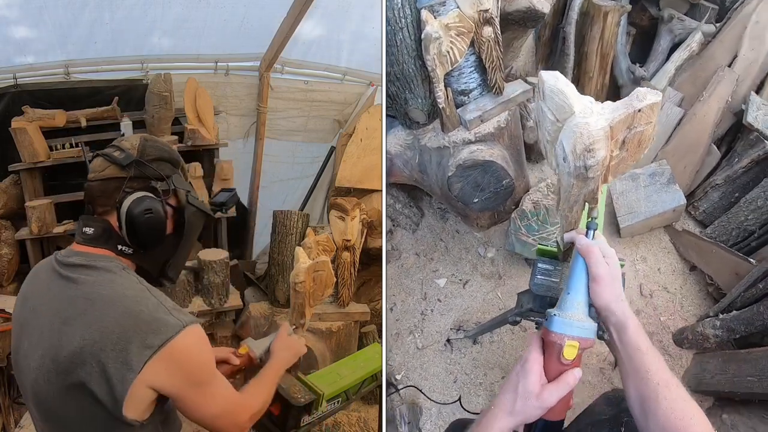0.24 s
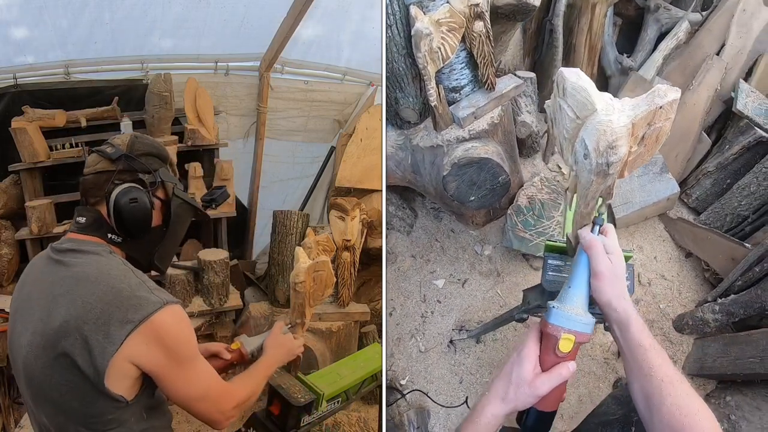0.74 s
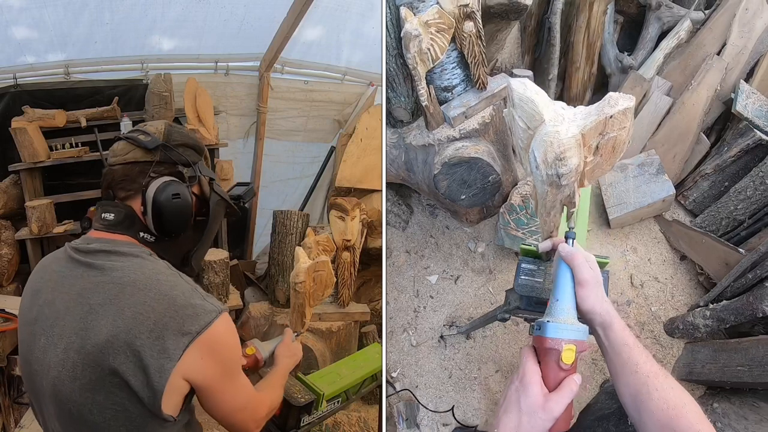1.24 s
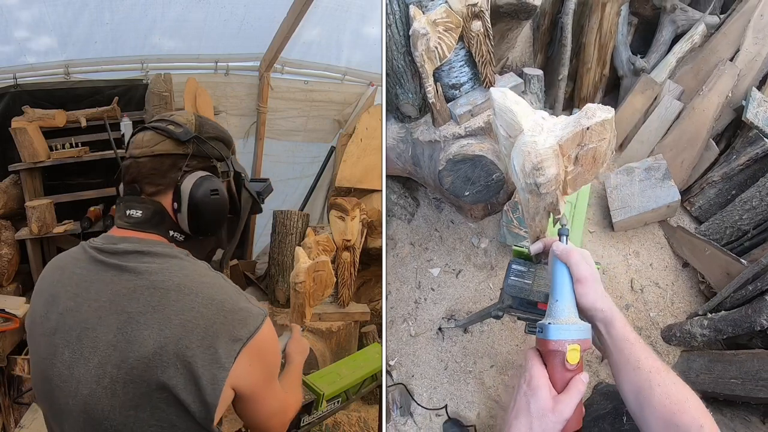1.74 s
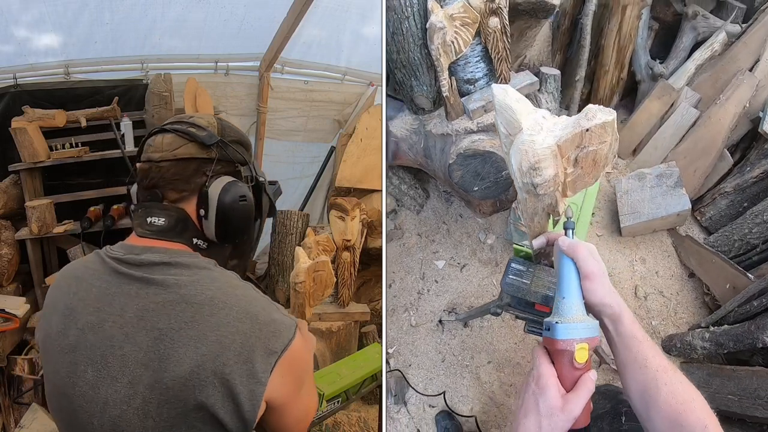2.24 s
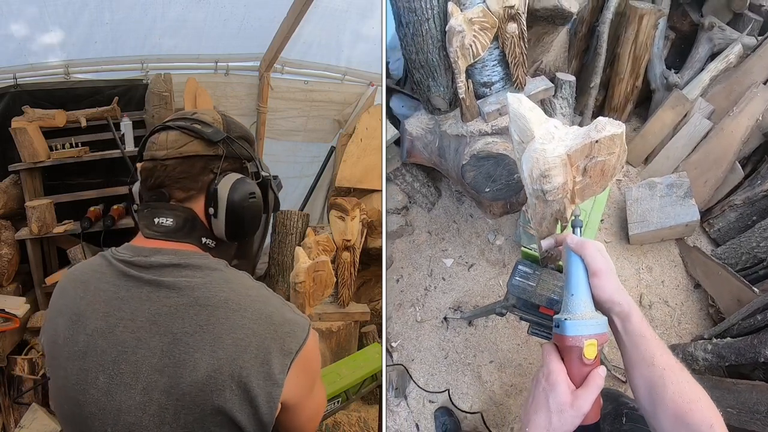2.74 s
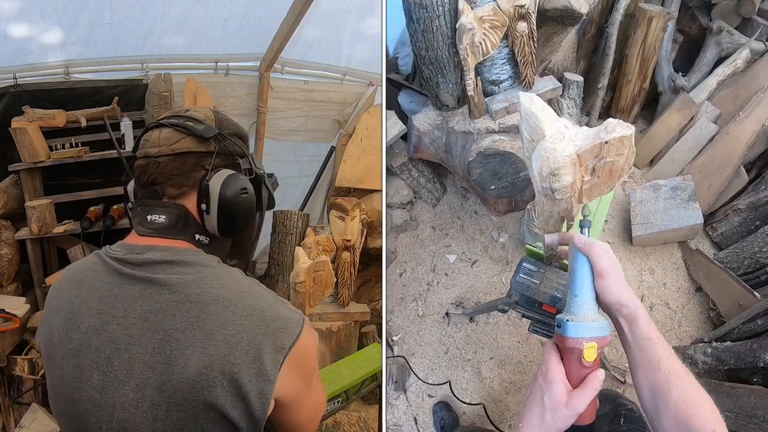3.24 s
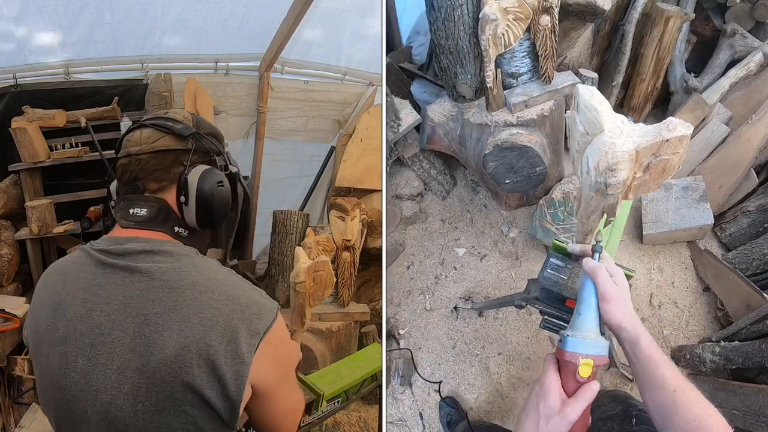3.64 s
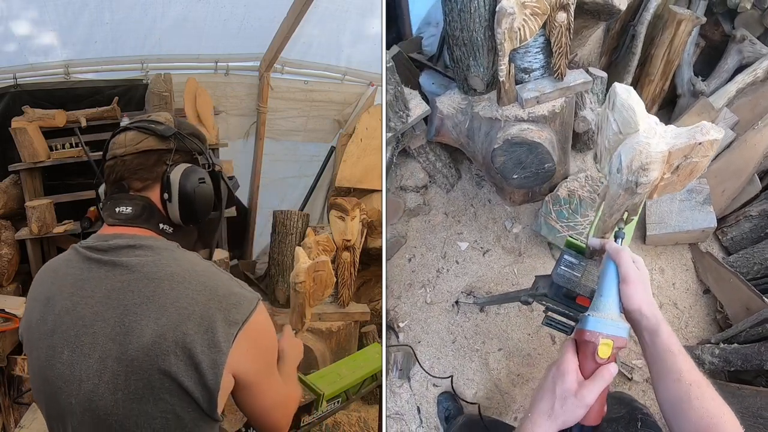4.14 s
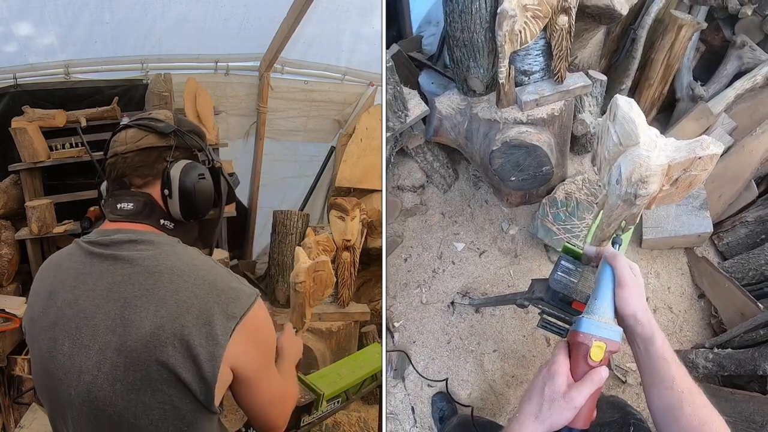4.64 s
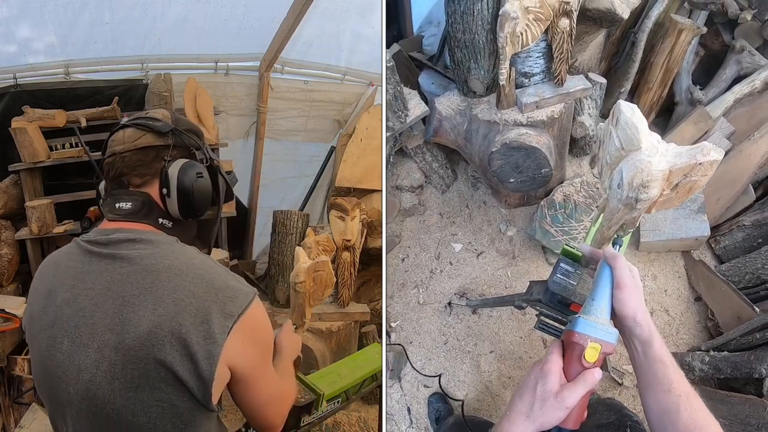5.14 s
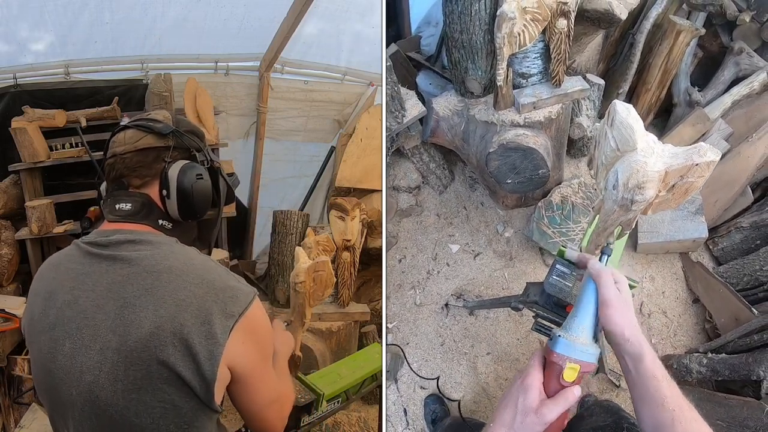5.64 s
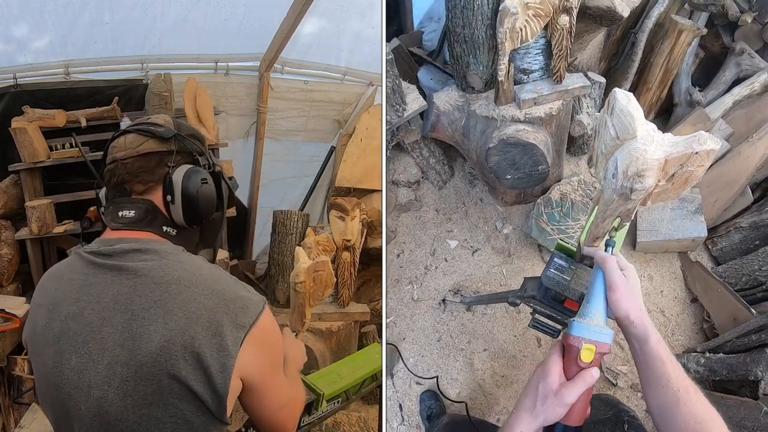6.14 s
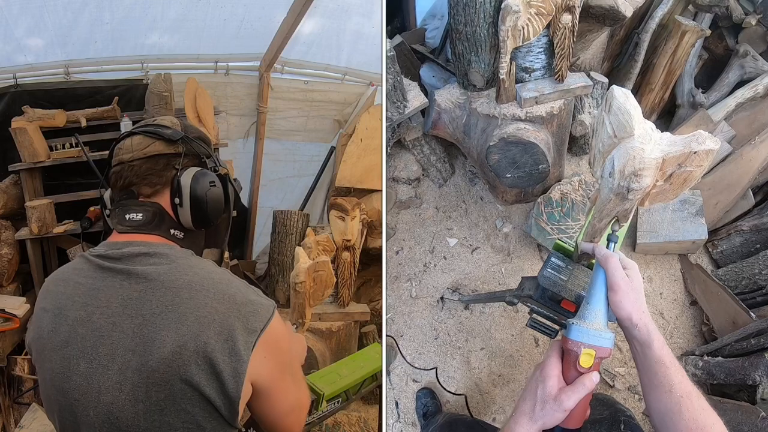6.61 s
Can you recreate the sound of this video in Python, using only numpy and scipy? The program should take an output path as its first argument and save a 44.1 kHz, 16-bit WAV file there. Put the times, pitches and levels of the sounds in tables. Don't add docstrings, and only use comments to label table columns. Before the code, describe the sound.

An electric die grinder runs throughout in a tent workshop, heard close by a small stereo camera: dense fan roar, a hum near 470 hertz, hissing chips and faint low rumble. It is already cutting at 0 s, buzzing unevenly until about 0.5, then lightens and speeds up. At 1.1 a strong, piercing singing pass begins, stuttering until 1.9, followed at once by a short ringing touch to 2.15. From 2.3 to 3.2 a brighter, raspier pass drags the pitch down; it rises again by 3.7. Steady cutting starts around 3.6, with extra contact near 4, then a loud, long squeal from 4.4 to 5.3 sinks lowest at its end. The motor recovers. Two sharp bites at 5.9 run into a final buzzing, singing pass from 6.1, continuing to the end near 6.9. Loud bites momentarily duck the roar.

```python
import sys
import numpy as np
from scipy import signal
from scipy.fft import rfft, irfft, next_fast_len
from scipy.io import wavfile
from scipy.ndimage import uniform_filter1d

SR = 44100
rng = np.random.default_rng(int(sys.argv[2]) if len(sys.argv) > 2 else 0)


def store_pcm(level_fs):
    pcm = np.round(np.clip(level_fs, -1, 1) * 32767).astype(np.int16)
    wavfile.write(sys.argv[1], SR, np.atleast_2d(pcm).T)


def undo_db(level):
    steps = np.asarray(level, float) / 20
    return 10 ** steps


N = 302967

# (frequency [Hz], difference [dB])
LEFT_LEAN = [(130, -1), (400, 2), (700, -2.5), (2500, -2), (6000, -1.5), (13000, 1)]
# (time [s], length [s], upper harmonics [dB], singing harmonics [dB])
PASSES = [
    (-.03, 0.51, -54, -47),
    (1.092, 0.85, -50, -44.5),
    (1.93, 0.22, -67, -46),
    (2.3, 0.93, -45, -57),
    (3.616, 1, -48, -51.5),
    (3.954, 0.434, -49, -55.5),
    (4.355, 0.99, -50, -45.5),
    (5.87, 0.077, -42, -44.5),
    (5.949, 0.058, -38, -39.5),
    (6.083, .9, -46, -46.5),
]


def in_time(rows):
    s, *columns = np.transpose(rows)
    return [np.interp(np.arange(N) / SR, s, column) for column in columns]


def at_hz(points, hz):
    table_hz, values = np.array(points).T
    return np.interp(np.log(hz), np.log(table_hz), values)


def drift(rate, db=None):
    r = np.exp(-80 * np.pi * rate / SR)
    noise = rng.standard_normal(N // 40 + 2002)
    slow = signal.lfilter([1], [1, -2 * r, r * r], noise)[2000:]
    slow = slow / np.std(slow)
    values = slow if db is None else undo_db(db * slow)
    return np.interp(np.arange(N) / 40, np.arange(len(slow)), values)


def swell(start, length):
    out = np.zeros(N)
    span = np.arange(round(start * SR), min(round((start + length) * SR), N))
    out[span] = np.sqrt(np.sin(np.linspace(0, np.pi, len(span))) + 1e-9)
    return out


def resting(start, length, flash_db=0):
    land_s, settle_s, lift_s = 0.015, 0.11, 0.028
    end = start + length
    landed = start + land_s
    settled = landed + min(settle_s, length / 3)
    times = [start, landed, settled, max(end - lift_s, settled), end]
    return np.interp(np.arange(N) / SR, times, [0, undo_db(flash_db), 1, 1, 0])


def stereo_noise(spectrum, resonances):
    # (frequency [Hz], likeness [0 to 1])
    likeness = [(60, 0.96), (130, 0.91), (290, 0.9), (630, 0.82), (1380, 0.57), (3010, 0.89), (6590, 0.14),
                (14400, 0.01)]
    size = next_fast_len(N)
    hz = np.maximum(np.arange(size // 2 + 1) * SR / size, 1)
    ringing_db = sum(db / (1 + (2 * (hz - f) / width) ** 2) for f, width, db in resonances)
    colour_db = at_hz(spectrum, hz) + ringing_db
    alike = np.clip(at_hz(likeness, hz), 0, 1)
    mid, side = rfft(rng.standard_normal((2, size)))
    port = np.array([[1], [-1]])
    both = np.sqrt(1 + alike) * mid + np.sqrt(1 - alike) * side * port
    both = both * undo_db(colour_db + port * at_hz(LEFT_LEAN, hz) / 2)
    return hz, size, both / np.std(irfft(both, size))


def harmonic(turn, k, gain, flutter_db, waver, spread):
    phase = k * turn + waver * drift(42) + rng.uniform(0, 2 * np.pi)
    apart = spread * drift(2.2)
    lean = undo_db(at_hz(LEFT_LEAN, 470 * k) / 2) * np.exp(0.38 * apart)
    gain = np.sqrt(2) * gain * drift(20, db=flutter_db)
    return np.array([gain * lean * np.sin(phase + apart), gain / lean * np.sin(phase - apart)])


def above(level_db, floor_db):
    power = undo_db(2 * level_db)
    return 10 * np.log10(np.maximum(power - undo_db(2 * floor_db), power * undo_db(-16)))


def swells(rows, trim_db=0):
    return sum(undo_db(db + trim_db) * swell(s, length) for s, length, db in rows)


def of_multiple(rows, k):
    return [(s, length, db) for s, length, multiple, db in rows if multiple == k]


def raised(k):
    # (time [s], length [s], multiple of the shaft rate, level [dB])
    catches = [(.578, .03, 9, -40), (1.94, .04, 9, -39), (0, .57, 2, -45), (2.5, .45, 2, -50),
               (5.96, .06, 11, -44), (5.96, .06, 9, -44), (1.12, .14, 12, -48), (1.12, .16, 11, -50),
               (6.12, .45, 10, -50), (6.12, .6, 12, -51), (6.4, .33, 13, -51), (1.68, .36, 12, -51)]
    return swells(of_multiple(catches, k))


def surroundings(roar_db):
    # (frequency [Hz], level [dB per Hz])
    rumble = [(15, -41), (25, -14), (75, 0), (129, -14), (167, -2), (269, -3.5), (330, 3.5), (430, -19),
              (730, -120)]
    hz, size, both = stereo_noise(rumble, [])
    return undo_db(-66 + 0.47 * (roar_db + 48) + 1.1 * drift(2.9)) * irfft(both, size)[:, :N]


def workpiece():
    # (time [s], length [s], level [dB])
    drones = [
        (0.273, .09, -57),
        (1.707, 0.16, -53),
        (4.98, 0.53, -58),
    ]
    drone_hz = 356
    gain = swells(drones) * undo_db(1.3 * drift(16))
    return gain * np.sin(2 * np.pi * drone_hz * np.arange(N) / SR + 0.55 * drift(15))


def roar(turn, roar_db, rasp_db, hiss_db):
    # (frequency [Hz], level [dB per Hz])
    air = [(150, -27), (300, -23), (450, -15.5), (620, -9), (1000, -6.5), (2200, -3), (3000, 0.5),
           (4500, -7), (6250, -6), (8070, -6), (10000, -10.5), (10800, -15), (12900, -22.5), (14500, -29.5)]
    # (frequency [Hz],
    # width [Hz], level [dB])
    peaks_and_dips = [(530, 26, -14.5), (762.4, 42, 9), (1065, 190, 6), (1345, 120, 5.5), (1672, 23, 8.5),
                      (2730, 170, -0.5), (8120, 510, 7), (9600, 400, 7), (10600, 220, -16), (13600, 240, -14),
                      (14100, 450, 8)]
    hz, size, both = stereo_noise(air, peaks_and_dips)
    out, gust, throb = 0, drift(19), np.cos(turn)
    for octave in range(-3, 5):
        share = np.cos(np.clip(np.log2(hz / 1000) - octave, -1, 1) * np.pi / 2) ** 2
        rasp = np.interp(octave, [0, 2, 3], [0, 1, 0]) ** 2
        hiss = octave > 2
        patch_db = roar_db + 13.5 + rasp * rasp_db + hiss * hiss_db
        gain = undo_db(patch_db + 0.6 * gust + 0.98 * drift(7.7))
        out = out + gain * (1 + 0.053 * hiss * throb) * irfft(both * share, size)[:, :N]
    return out


def motor(turn, speed, hum_db, roar_db):
    # (multiple of the shaft rate, level [dB])
    whines = [
        (4, -49.5),
        (27, -61.5),
    ]
    out = harmonic(turn, k=1, gain=undo_db(hum_db), flutter_db=0.5, waver=.03, spread=0.22)
    wander_db = 2 * drift(3.4)
    second_db = -50 + 0.2 * (hum_db + 48) + wander_db
    second = undo_db(above(second_db, roar_db - 13)) + raised(2)
    out += harmonic(turn, k=2, gain=second, flutter_db=2.0, waver=0.38, spread=0.89)
    for k, db in whines:
        gain = undo_db(db + .5 * (roar_db + 47) + 1.5 * drift(1.5) + .007 * k * (speed - 482))
        out += harmonic(turn, k=k, gain=gain, flutter_db=2.1, waver=.3, spread=.5 + .03 * k)
    return out


def burr(turn):
    # (multiple of the shaft rate, level [dB])
    upper_shares = [(3, -14), (4, -32), (9, -13.5), (12, -19), (15, -18.5), (16, -12), (18, -21.5),
                    (21, -21), (23, -28.5), (26, -28.5), (30, -36)]
    # (time [s], length [s], multiple of the shaft rate, level [dB])
    squeals = [(0.13, 0.27, 14, -45), (0.17, 0.18, 11, -48), (0.68, 0.17, 4, -44), (1.1, 0.21, 15, -49),
               (1.11, 0.16, 13, -49), (1.13, 0.23, 10, -47), (1.15, 0.29, 9, -50), (1.37, 0.54, 16, -47),
               (1.86, 0.25, 9, -51), (2.02, 0.1, 16, -46), (2.65, 0.26, 18, -47), (2.7, 0.17, 17, -48),
               (6.3, 0.11, 16, -42), (2.97, 0.18, 18, -46), (4.01, 0.12, 16, -43), (4.22, 0.09, 12, -49),
               (4.37, 0.81, 11, -48), (4.39, 0.49, 9, -46), (4.44, 0.42, 16, -49), (4.58, 0.71, 4, -54),
               (4.6, 0.29, 18, -47), (4.84, 0.44, 13, -49), (4.91, 0.39, 18, -47), (4.95, 0.18, 17, -48),
               (5.14, 0.25, 15, -48), (5.86, 0.17, 9, -45), (5.95, 0.07, 14, -44), (5.96, 0.06, 12, -43),
               (6.11, 0.24, 9, -46), (6.11, 0.1, 16, -40)]
    sing_shares = [-2.9, 2.5, -6, -6.0]
    # (time [s], length [s], level [dB])
    fifth = [(0, 0.11, -45), (.15, 0.13, -38), (.26, 0.2, -43), (.43, 0.022, -33), (1.2, 0.38, -38),
             (1.62, .28, -43.5), (1.935, .04, -33.5), (4, 0.038, -39), (4.15, .03, -47), (4.27, .04, -41),
             (4.385, .14, -38.5), (4.6, 0.07, -37), (4.7, 0.27, -48), (5.87, 0.015, -32.5),
             (5.96, 0.063, -44), (6.27, 0.049, -39), (6.36, 0.025, -35), (6.42, 0.046, -36),
             (6.5, 0.11, -38), (6.79, 0.091, -42)]
    sixth = [(0, 0.14, -36.5), (0.217, 0.23, -38.5), (0.437, .11, -35), (1.114, .035, -29.5),
             (1.153, .06, -30.5), (1.205, 0.096, -28.5), (1.336, 0.062, -29.5), (1.383, .17, -35.5),
             (1.508, 0.09, -36), (1.58, 0.043, -32.5), (1.63, 0.067, -34), (1.684, 0.16, -35.5),
             (1.961, .05, -29.5), (2.024, .12, -28), (2.283, .035, -39), (4.025, 0.053, -34),
             (4.252, 0.021, -36), (4.298, 0.014, -30), (4.394, .03, -34), (4.406, 0.091, -34.5),
             (4.501, 0.32, -29), (4.773, 0.21, -36), (5.05, 0.15, -40), (5.965, 0.045, -33),
             (6.122, .06, -38), (6.22, .04, -35), (6.27, 0.056, -34), (6.37, 0.084, -33),
             (6.673, .05, -35.5), (6.834, .1, -34.5)]
    seventh = [(1.115, 0.039, -35.5), (1.2, 0.16, -47), (1.45, .4, -48), (2.045, .05, -39),
               (4.38, 0.29, -42), (4.76, 0.39, -35), (5.05, 0.038, -49), (5.1, 0.13, -38),
               (5.2, 0.086, -34.5), (5.27, 0.07, -44), (5.98, 0.044, -30.5), (6.12, 0.27, -46)]
    eighth = [(1.22, 0.14, -43), (4.01, 0.018, -42), (4.15, 0.033, -43), (4.3, 0.079, -44),
              (4.39, 0.03, -33), (4.56, .03, -56), (4.66, 0.41, -45), (5.12, 0.14, -36.5),
              (6.129, 0.091, -31), (6.24, .12, -41)]
    graze_db, landing_db = -47, 4.5
    edge = undo_db(graze_db) + sum(undo_db(db) * resting(s, length, landing_db) for s, length, db, _ in PASSES)
    singing = sum(undo_db(db) * resting(s, length) for s, length, _, db in PASSES)
    singing = singing * drift(20.3, db=3.5)
    out = 0
    for i, digs in enumerate([fifth, sixth, seventh, eighth]):
        sung = singing * undo_db(sing_shares[i]) * drift(18, db=2)
        gain = np.hypot(sung, swells(digs, 0.5))
        out += harmonic(turn, k=5 + i, gain=gain, flutter_db=1, waver=.14, spread=.2)
    chatter = drift(31, db=2.6)
    for k in [3, 4, *range(9, 31)]:
        share = edge * undo_db(at_hz(upper_shares, k)) * drift(6.5, db=4.0)
        share = share + swells(of_multiple(squeals, k), -1.5)
        gain = chatter * share + raised(k)
        out += harmonic(turn, k=k, gain=gain, flutter_db=2, waver=.018 * k, spread=.5)
    return out


def scene():
    # (time [s], speed [turns per s])
    shaft_speed = [(0, 463.4), (.62, 470), (.9, 480.5), (1.177, 483.4), (1.532, 479.8), (1.975, 470),
                   (2.27, 478.8), (2.45, 477.6), (2.89, 453.5), (3.12, 455), (3.72, 485.5), (4.37, 485.5),
                   (4.7, 459.5), (4.9, 451.5), (5.06, 450.5), (5.3, 436), (5.96, 475.5), (6.869, 481)]
    # (time [s], air roar [dB], shaft hum [dB])
    motor_levels = [(0, -46.5, -50.5), (.52, -45, -40.5), (.6, -46, -48), (1.01, -43.5, -45),
                    (1.2, -48.5, -52.5), (1.85, -47, -50.5), (2.09, -51.5, -52.5), (2.18, -47, -49),
                    (3.66, -44.5, -43.5), (4.36, -45, -50), (4.44, -51, -56), (5.05, -50, -46.5),
                    (5.22, -49, -50), (5.36, -47.5, -44.5), (5.85, -46, -46), (6.03, -49.5, -51),
                    (6.3, -49, -51), (6.87, -47, -45.5)]
    speed = uniform_filter1d(in_time(shaft_speed)[0], size=2000)
    turn = 2 * np.pi * np.cumsum(speed) / SR
    roar_db, hum_db = in_time(motor_levels)
    cutting = np.minimum(sum(swell(max(s, 0), length) for s, length, *_ in PASSES), 1)
    rasp_db = -0.04 + 0.0256 * (speed - 470) - 0.12 * (roar_db + 45.0)
    hiss_db = -2 + 1.5 * cutting - 0.47 * (roar_db + 49.0)
    background = surroundings(roar_db) + workpiece()
    tool = roar(turn, roar_db, rasp_db, hiss_db) + motor(turn, speed, hum_db, roar_db) + burr(turn)
    return background + tool


def roll_off(x):
    return signal.sosfilt(signal.butter(12, 15010, fs=SR, output="sos"), x)


def record(dry):
    return roll_off(dry)


dry = scene()
out = record(dry)
store_pcm(out)
```